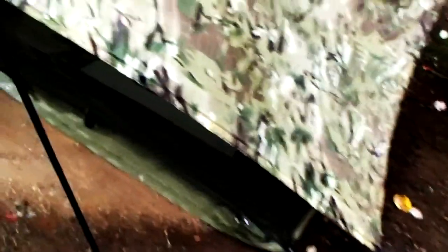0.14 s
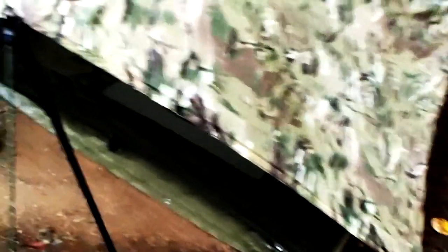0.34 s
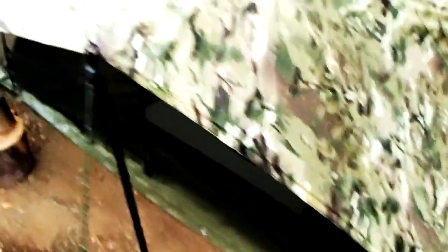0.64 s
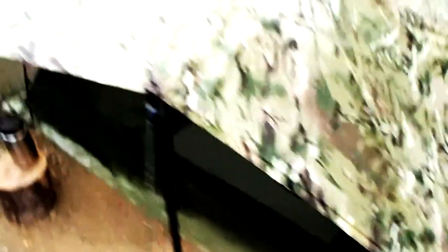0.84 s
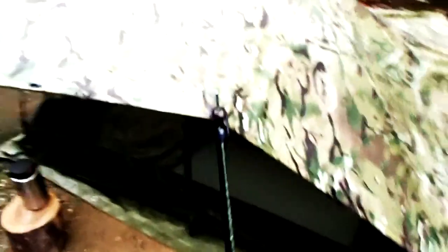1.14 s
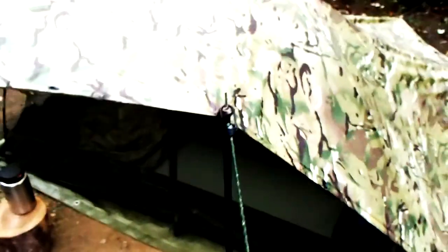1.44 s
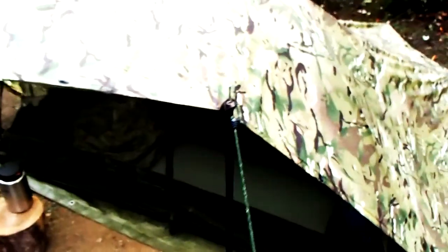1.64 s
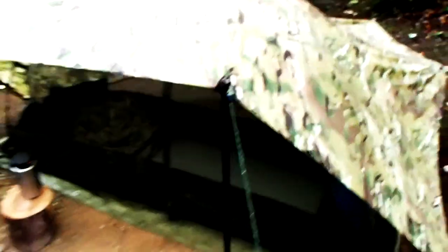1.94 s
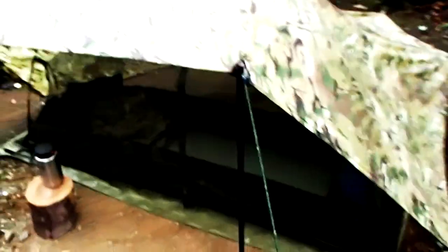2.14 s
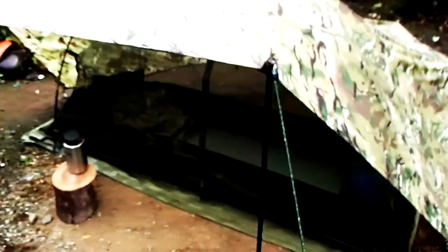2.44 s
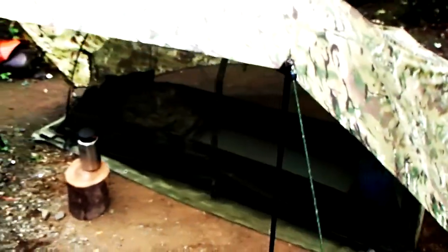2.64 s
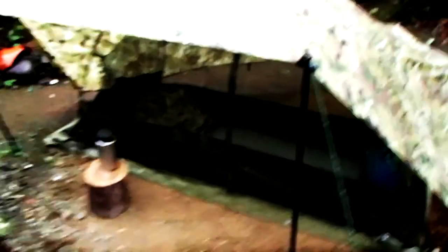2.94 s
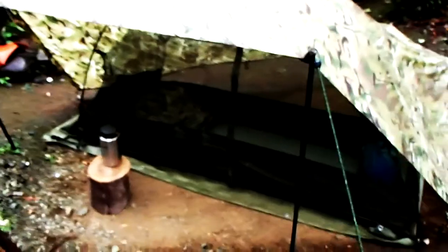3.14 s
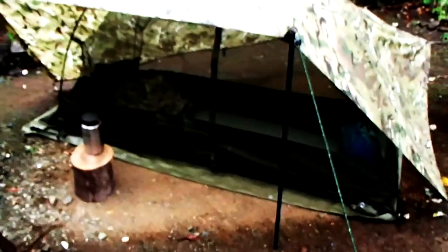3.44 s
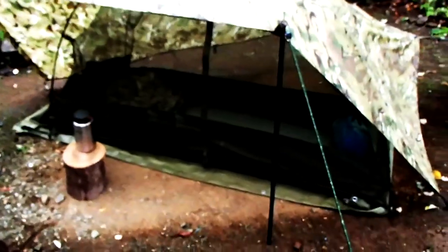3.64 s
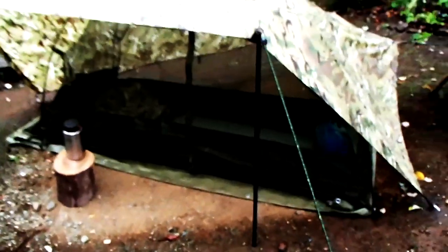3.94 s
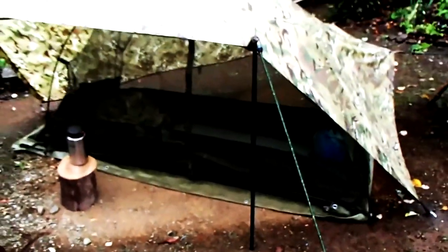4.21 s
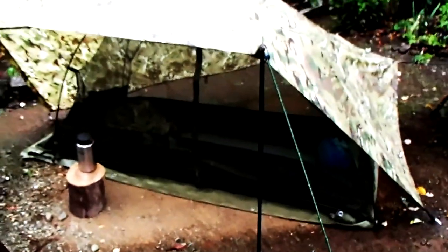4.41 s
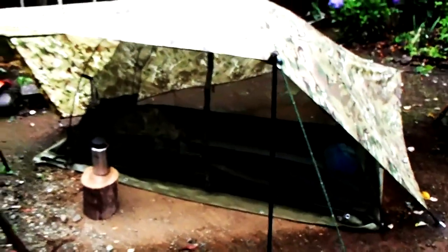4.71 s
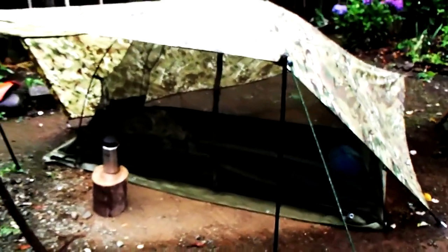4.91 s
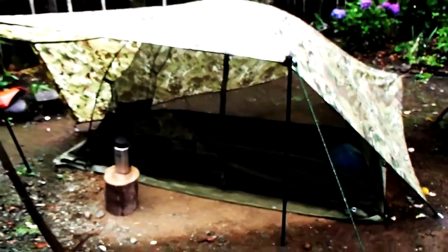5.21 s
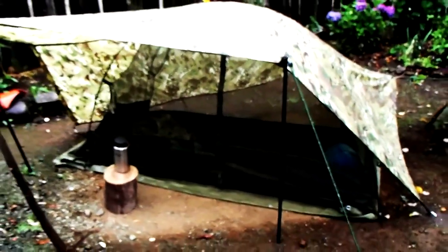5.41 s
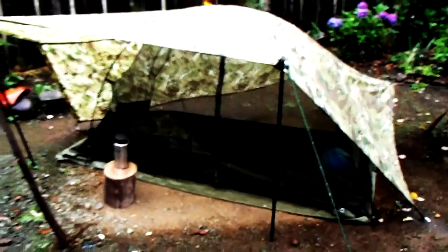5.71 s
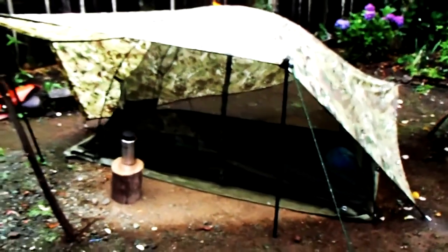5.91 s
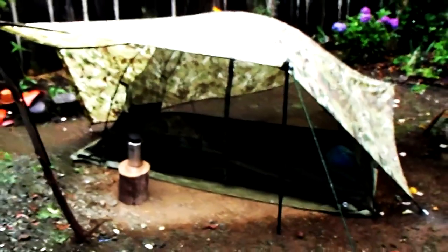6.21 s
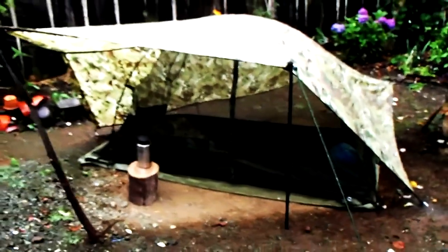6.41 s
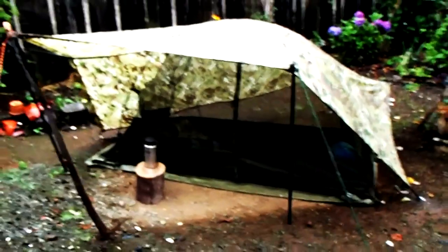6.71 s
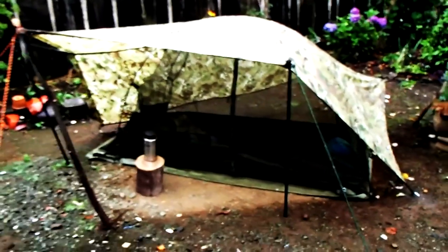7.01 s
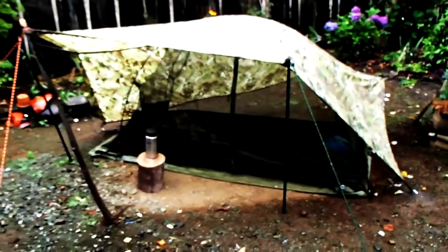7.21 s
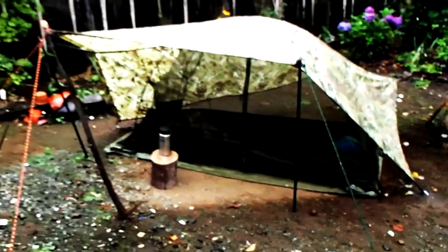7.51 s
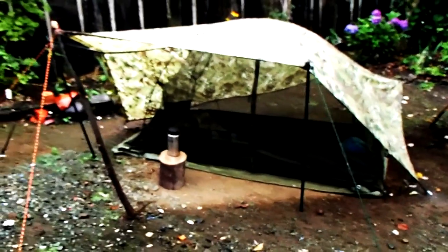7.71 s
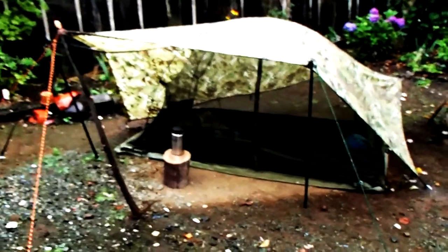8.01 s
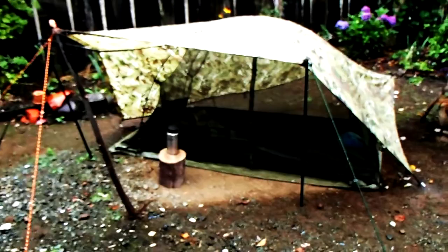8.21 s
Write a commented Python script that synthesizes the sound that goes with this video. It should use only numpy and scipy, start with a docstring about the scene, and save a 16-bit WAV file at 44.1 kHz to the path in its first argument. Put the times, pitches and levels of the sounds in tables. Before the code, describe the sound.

Steady rain on a tarp shelter in an open garden, with a continuous dense patter of small dry slaps, around two hundred a second, over a mid-toned hiss from wet soil and leaves and a soft low rumble. From 0 to 3 seconds the cloth is close: bright, snappy single drops crowd together, nearest around 0.6 to 0.9, with strong taps at 1.7, 2.1 and 2.5. From about 3.2 the patter is farther and quieter, the taps sparser and rounder, continuing evenly to the end at 8.3. Fine high spray prickles throughout. Soft, low handling thumps occur, clearest near 1.0 to 1.1, 3.9 and 5.2. At 6.27 a very loud, hard, dry tick hits beside the microphone, followed by a weaker, fuller one at 6.5. Barely audible low hums drift far away, one rising near 7.5. Echoes are tiny and short.

```python
"""Rain on a garden tarp

Steady rain falls on a tarp shelter in a garden, heard from a hand-held camera that ends up farther from the cloth.
Drops slap the taut fabric as shaped pulses, each with a quick echo, over filtered noise for the wash of
rain on wet ground and leaves. High spray ticks, and two drops land right by the microphone as dry pulses.
The hand bumps the camera softly with damped low waves; faint low tones and far hums waver as sines."""
import sys
import numpy as np
from scipy import signal
from scipy.fft import rfft, irfft
from scipy.io import wavfile
from scipy.ndimage import uniform_filter1d

SR = 44100
rng = np.random.default_rng(int(sys.argv[2]) if len(sys.argv) > 2 else 0)


def wrap_up_sound(samples):
    """Save the sound to the file named by the first command line argument, as 16-bit audio."""
    columns = np.atleast_2d(samples).T
    # keep every value between -1 and 1, then stretch to whole-number steps
    tamed = np.clip(columns, -1, 1)
    steps = np.round(tamed * 32767).astype(np.int16)
    wavfile.write(sys.argv[1], SR, steps)


N = 368235

# relative spectrum of the spray of a bursting drop: (pitch_hz, level_db_per_hz)
SPRAY_SPECTRUM = [(1000, -38), (4000, -7), (7000, 2.5), (9000, -0.5), (12000, 2.5), (15000, 5.5)]
DROP_SIZE = 2048  # samples in the sound of one drop
DROP_HZ = np.fft.rfftfreq(DROP_SIZE, 1 / SR)
LEAD_S = 0.0018  # a faint wave in the cloth precedes the slap by this much


def amp(db):
    """Decibels to gain."""
    return 10 ** (np.asarray(db) / 20)


def evened(x):
    """Scales to rms 1."""
    return x / np.sqrt(np.mean(x ** 2) + 1e-20)


def read(points, hz):
    """Reads a spectrum on a log-frequency axis."""
    f, value = np.transpose(points)
    return np.interp(np.log(hz + 1), np.log(f + 1), value)


def add(mix, start_s, sound):
    """Mixes a sound in at a time, cutting what runs past the end."""
    part = mix[max(round(start_s * SR), 0):][:len(sound)]
    part += sound[:len(part)]


def drift(shape, size):
    """Smoothed noise of rms 1, wandering along the last axis over some `size` steps."""
    once = uniform_filter1d(rng.standard_normal(shape), size)
    return evened(uniform_filter1d(once, size))


def click(db):
    """The sharpest causal (minimum-phase) pulse with this spectrum, with the energy of 3 ms at rms 1."""
    energy_samples = 128
    log_gain = np.log(amp(np.r_[db, db[-2:0:-1]]))
    minimum_phase = np.exp(np.conj(signal.hilbert(log_gain)))[:len(db)]
    pulse = irfft(minimum_phase)
    return evened(pulse) * np.sqrt(energy_samples / len(pulse))


def scatter(pulse, share, t60):
    """Trails a pulse with a short burst of random ripples that die away in t60 seconds, keeping its energy."""
    t = np.arange(len(pulse)) / SR
    onset = 1 - np.exp(-t / 0.000094)
    ripples = rng.choice([-1, 1], len(t)) * amp(-60 * t / t60) * onset
    trail = signal.fftconvolve(pulse, ripples / np.linalg.norm(ripples))[:len(t)]
    return evened(pulse + share * trail) * np.sqrt(np.mean(pulse ** 2))


def nearness_db(t):
    """Level of the patter on the tarp relative to 1 m away: it falls as 1 / distance."""
    # the camera passes the cloth, then backs away: (time_s, distance_m)
    camera_path = [(0, 1.04), (.5, 1.14), (.8, 0.77), (1.6, 1.17), (2.2, 1.1), (3.2, 1.55), (8.35, 1.64)]
    return -20 * np.log10(np.interp(t, *np.transpose(camera_path)))


def slap(ring_hz, ring_db, thud_db, snap_db, splash_db, delay_s, echo_db,
         ring_width=0.17, thud_hz=1800, snap_hz=4500, lead_db=-12):
    """One drop on cloth: a thud with the damped ring of the struck patch, a spray tick and a ground echo."""
    # relative spectrum of a plain blow on the cloth: (pitch_hz, level_db_per_hz)
    cloth_spectrum = [(100, -23), (300, -10), (500, -3.5), (700, -1.9), (1100, 1.4), (1700, -2.5),
                      (2500, -3.2), (3300, -2.5), (3950, -0.5), (4500, -10), (5000, -8), (6800, -18.5),
                      (8500, -25), (15500, -35.5)]
    ring = 1 / (1 + (np.log((DROP_HZ + 1) / ring_hz) / ring_width) ** 2)
    thud = 1 / (1 + (DROP_HZ / thud_hz) ** 6)  # slack cloth gives more body than taut cloth
    snap = 1 - 1 / (1 + (DROP_HZ / snap_hz) ** 12)  # a drop that meets a film of water lands more softly
    cloth_db = read(cloth_spectrum, DROP_HZ) + ring_db * ring + thud_db * thud + snap_db * snap
    cloth = click(cloth_db)
    spray = amp(splash_db) * scatter(click(read(SPRAY_SPECTRUM, DROP_HZ)), share=2.5, t60=0.0073)

    out = amp(lead_db) * scatter(cloth, share=5.0, t60=0.01)  # a faint wave runs ahead through the taut weave
    add(out, LEAD_S, scatter(cloth, share=0.62, t60=0.011) + spray)
    echo = scatter(cloth + spray, share=0.96, t60=0.013)  # rough ground smears the echo
    add(out, LEAD_S + delay_s, amp(echo_db) * echo)
    return out


def patter(per_s=195, clumping=0.13, spread_db=2.5, largest=1.8, count=500, db_at_1m=-47):
    """Many small drops, each striking one of `count` patches with its own slap; level follows tarp distance."""
    rate = per_s * np.maximum(1 + clumping * drift(N, size=1500), 0)  # drops arrive in little flurries
    hits = np.flatnonzero(rng.random(N) < rate / SR)
    size = amp(spread_db * np.minimum(rng.exponential(1, N), largest))
    patch = rng.integers(0, count, N)

    slaps = []
    for ring_hz in np.geomspace(720, 4300, count):
        polarity = rng.choice([-1, 1])
        sound = slap(ring_hz,
                     ring_db=rng.uniform(3.7, 13),
                     thud_db=rng.normal(0, 2.3),
                     snap_db=rng.normal(0, 3.7),
                     splash_db=rng.normal(-29, 3.3),
                     delay_s=rng.uniform(0.003, 0.0052),
                     echo_db=rng.uniform(-13, 0),
                     ring_width=rng.uniform(0.089, 0.16))
        slaps.append(polarity * sound)

    out = np.zeros(N)
    for i in hits:
        add(out, i / SR, size[i] * slaps[patch[i]])
    return amp(db_at_1m + nearness_db(np.arange(N) / SR)) * evened(out)


def wash(level_db=-46.5, patchy_db=1.04, flicker_db=-0.06, follow=0.14, rumble_hz=90):
    """Countless far drops on soil and leaves merge into a restless noise hiss over a low outdoor rumble."""
    # relative spectrum of the far rain and the rumble: (pitch_hz, level_db_per_hz)
    far_spectrum = [(15, -16), (35, -3), (80, -1.7), (130, -3), (200, -0.9), (370, -1), (500, -1.5),
                    (680, -.2), (1100, 0), (1600, -2), (2400, -3), (3400, -3), (3950, -0.5), (4500, -11),
                    (4900, -8.5), (6500, -15.5), (8200, -20.5), (15500, -24)]
    # slow level of the deepest rumble: (time_s, level_db)
    rumble_level = [(0, 4), (1.5, -6), (2.4, 3), (3.4, 1), (4.3, 1), (4.65, 4), (4.9, 4), (6.4, 0.5),
                    (7.5, 0.5), (8.35, 1)]
    window, hop = 1024, 256  # samples
    frames, hz = N // hop + 5, np.fft.rfftfreq(window, 1 / SR)
    frame_s = np.arange(frames) * hop / SR
    shape = (len(hz), frames)
    noise = rng.standard_normal(shape) + 1j * rng.standard_normal(shape)

    # small patches of time and pitch rise and fall
    patches = evened(uniform_filter1d(drift(shape, size=6), size=24, axis=0))
    near_db = nearness_db(frame_s)
    swell_db = follow * (near_db - near_db.mean()) + flicker_db * drift(frames, size=4)
    rain_share = hz / (hz + 400)  # the bass does not follow the rain
    rumble_share = 1 / (1 + (hz / rumble_hz) ** 4)
    rumble_db = rumble_share[:, None] * np.interp(frame_s, *np.transpose(rumble_level))

    spectrum_db = read(far_spectrum, hz)[:, None] + patchy_db * patches
    noise *= amp(spectrum_db + rain_share[:, None] * swell_db + rumble_db)
    sound = signal.istft(noise, nperseg=window, noverlap=window - hop)[1][:N]
    return amp(level_db) * evened(sound)


def fizz(per_s=260, spread_db=3.0, level_db=-66):
    """Fine spray ticks from drops bursting on gravel: short noise bursts at random moments."""
    ticks = (rng.random(N) < per_s / SR) * amp(spread_db * np.minimum(rng.exponential(1, N), 4))
    t = np.arange(DROP_SIZE) / SR
    decay = amp(-60 * t / 0.011)
    bursts = signal.oaconvolve(ticks, decay)[:N] * rng.standard_normal(N)
    colour = click(read(SPRAY_SPECTRUM, DROP_HZ))
    return amp(level_db) * evened(signal.oaconvolve(bursts, colour)[:N])


def far_tones(waver=0.01):
    """Faint low tones and far hums: wavering sines that glide, swell and fade; the last one rises in pitch."""
    # faint low tones and far hums that swell and fade:
    # (start_s, end_s, first_pitch_hz, last_pitch_hz, level_db)
    tones = [(0, .4, 204.7, 205, -63.5), (0.527, 1.08, 91.5, 90, -56), (1.85, 2.145, 70, 69.6, -63),
             (3.6, 5, 194.5, 196, -67.5), (5.501, 6.55, 79, 77.9, -69), (6.517, 7.25, 93.6, 93, -63),
             (6.8, 7.602, 200, 182.3, -68), (7.364, 7.951, 336, 428, -65)]
    out = np.zeros(N)
    for start_s, end_s, first_hz, last_hz, level_db in tones:
        n = max(round((end_s - start_s) * SR), 2)
        glide_hz = np.linspace(first_hz, last_hz, n)
        turns = np.cumsum(glide_hz * (1 + waver * drift(N, size=4000)[:n])) / SR
        tone = np.sqrt(2) * np.sin(2 * np.pi * turns)
        add(out, start_s, amp(level_db) * tone * signal.windows.tukey(n, 0.4))
    return out


def taps(typical_db=-37, splash_db=-20, splash_per_db=-0.3, echo_s=0.0041, echo_spread_s=0.0007):
    """The single drops that stand out: one slap each, with spray that grows more slowly than the thud."""
    # drops on the tarp, the ring being that of the struck patch:
    # (start_s, level_db, ring_hz, ring_db, thud_db, snap_db, ground_echo_db)
    tarp_drops = [(0.1206, -40.5, 2480, 6, 3, -6, 1), (0.1841, -32.5, 2330, 12, 0, 0, -11),
                  (0.1975, -42.5, 1800, 9, -3, -3, -1), (0.2227, -32.0, 2190, 6, -3, -6, -5),
                  (0.2745, -35.5, 2480, 6, -3, 0, -10), (0.2819, -35.5, 1020, 6, -3, -3, -8),
                  (0.3173, -38.0, 4410, 9, 3, -6, -8), (0.3986, -43.5, 1400, 12, 3, -3, -7),
                  (0.4274, -42.0, 2820, 9, 0, -3, -12), (0.4389, -43.5, 3420, 9, 0, -3, -5),
                  (0.6243, -29.5, 3010, 6, 3, 6, -1), (0.6322, -40.5, 3640, 3, 0, 0, -2),
                  (0.6461, -42.0, 2650, 9, 3, 0, 1), (0.6556, -40.5, 4140, 6, 3, -6, 0),
                  (0.6671, -35.0, 4140, 12, 6, -6, -2), (0.6872, -36.5, 2050, 6, 3, 0, -4),
                  (0.7157, -35.5, 1590, 9, 3, -6, -3), (0.7532, -35, 2050, 6, 3, -3, -7),
                  (0.7696, -40.0, 3010, 12, -3, 3, -3), (0.7797, -34.5, 4140, 18, -3, -3, -12),
                  (0.8319, -38.5, 1800, 12, 3, -3, -1), (0.9155, -36.0, 1590, 9, 0, -6, -12),
                  (0.9441, -38.0, 3010, 3, 0, 0, -2), (0.98, -36.0, 1920, 6, -3, -6, -12),
                  (1.0678, -39.0, 4700, 6, 0, 0, -6), (1.1062, -36.5, 3200, 6, 0, -3, -8),
                  (1.2048, -42.0, 2330, 6, -3, 3, -4), (1.2294, -40.0, 2190, 6, 3, 3, -4),
                  (1.2801, -40.0, 3420, 6, 3, -3, -2), (1.3779, -41.5, 2650, 12, 3, 0, 1),
                  (1.4195, -39.5, 3420, 12, 0, 0, -3), (1.4275, -32.5, 4700, 9, 0, 0, -1),
                  (1.5182, -38.5, 3880, 3, 0, -3, -6), (1.5468, -42.5, 840, 9, 3, 3, -2),
                  (1.5844, -43.0, 2330, 9, 0, 3, -12), (1.5974, -39.5, 2820, 6, -3, 0, -4),
                  (1.7142, -42.5, 1690, 6, 0, 3, -1), (1.7221, -29.5, 3640, 6, 3, 0, -3),
                  (1.7296, -40.0, 3420, 12, 0, 0, -12), (1.7757, -37.5, 4140, 6, 0, -3, -1),
                  (1.7847, -41.5, 3200, 6, -3, 6, -12), (1.9177, -39.5, 1800, 3, -3, 0, -6),
                  (2.0009, -38.5, 1590, 3, 0, 3, -3), (2.0444, -37.5, 1490, 12, 3, -3, -12),
                  (2.0654, -31.5, 2480, 6, 3, 0, -2), (2.0739, -42.5, 3200, 6, 0, 0, -3),
                  (2.0979, -35, 1400, 6, 3, -3, -2), (2.1316, -37, 3880, 6, 0, 3, -4),
                  (2.1777, -34.5, 3010, 9, -3, 3, -12), (2.2364, -40.5, 4700, 9, -3, 0, -12),
                  (2.251, -40.5, 1920, 6, 0, 3, -5), (2.2948, -36.0, 2480, 6, 3, -3, -4),
                  (2.3662, -38.5, 1490, 9, 0, -6, -3), (2.4129, -42.5, 4700, 6, 3, 0, 2),
                  (2.4904, -43.5, 2650, 9, 0, -3, 1), (2.5329, -41.0, 4700, 3, 0, -3, -10),
                  (2.5409, -31.5, 2650, 9, 6, 3, -1), (2.5761, -40.5, 3640, 6, -3, 3, -12),
                  (2.6465, -37.0, 2820, 6, 3, 3, -1), (2.7203, -40.5, 1800, 6, 3, 3, -6),
                  (2.7448, -36.5, 4140, 6, 3, -6, -5), (2.763, -37.5, 1490, 9, 0, -3, -8),
                  (2.7806, -38.0, 2050, 6, 0, 3, -12), (2.791, -43.0, 2050, 6, 0, 0, 2),
                  (2.8278, -40.0, 2050, 9, 0, 0, -8), (2.9419, -41.0, 1080, 9, 3, 3, -12),
                  (2.9756, -39.5, 2820, 9, 0, 0, -8), (3.0514, -39.0, 1400, 3, 0, 0, -2),
                  (3.0828, -40.0, 3010, 6, 0, 0, -4), (3.2539, -41.5, 2650, 12, 3, 0, -4),
                  (3.2999, -42.0, 650, 15, 0, 0, 0), (3.3818, -40.0, 1590, 6, 0, -3, -7),
                  (3.4989, -38.5, 1920, 6, 0, 0, -7), (3.5282, -38.5, 1310, 12, 0, -3, -6),
                  (3.5378, -40.0, 2190, 6, -3, 0, 0), (3.5794, -39.0, 1590, 9, -3, 3, 2),
                  (3.5926, -39.5, 3200, 9, 3, 3, -3), (3.6614, -38.0, 1490, 12, 0, 0, -4),
                  (3.7096, -37.5, 4700, 9, 6, 0, -1), (3.8209, -39.0, 3010, 9, 3, -3, -11),
                  (3.9362, -38.0, 3420, 6, -3, 0, -7), (4.1155, -39.5, 650, 6, 0, -3, -2),
                  (4.1375, -36.5, 4700, 9, -3, -9, -7), (4.2903, -39.5, 790, 9, 3, -3, -6),
                  (4.3035, -40.0, 2480, 9, 3, -3, 0), (4.3665, -35.5, 3640, 18, 0, -9, -12),
                  (4.4296, -38.5, 2820, 12, 3, -6, -5), (4.6299, -41.5, 790, 9, -3, 3, -4),
                  (4.8544, -40.0, 3200, 9, 0, -3, -11), (4.868, -43, 1100, 18, 0, -6, -9),
                  (4.881, -44, 1080, 18, 0, -6, -9), (4.9264, -42.5, 2050, 15, -3, 3, -4),
                  (4.9407, -38.5, 1690, 6, 3, 3, -7), (5.0494, -41.0, 2820, 9, 3, -3, 0),
                  (5.2153, -42.5, 2480, 6, 0, 0, -3), (5.247, -41.5, 1490, 12, 0, 6, -5),
                  (5.3261, -42.0, 1690, 9, 0, -3, -1), (5.5019, -36.5, 1920, 6, 3, 6, -3),
                  (5.7252, -40.5, 2650, 6, 3, -3, -1), (5.9774, -40.5, 2330, 3, -3, 0, -6),
                  (6.0515, -40.0, 790, 3, 0, 0, -12), (6.1102, -38.5, 1230, 9, 0, -6, -7),
                  (6.1468, -40.5, 2050, 12, 0, 0, -12), (6.4883, -39.5, 950, 6, 0, -3, 1),
                  (6.5465, -39.5, 2820, 9, -3, 3, -1), (6.6988, -42.5, 2650, 6, 0, 3, -1),
                  (6.7423, -38.0, 2480, 6, 0, 3, -5), (6.7913, -37, 3010, 6, 6, -3, -3),
                  (7.049, -39.0, 1920, 6, 3, 0, -12), (7.2648, -40.5, 3010, 3, 0, 3, -4),
                  (7.274, -42, 700, 18, 0, -3, -3), (7.4343, -41.5, 2480, 9, 0, 3, -4),
                  (7.5545, -39.5, 3880, 12, -3, 3, -12), (7.609, -43, 790, 12, 3, -3, -6),
                  (7.6508, -39.5, 1230, 6, 0, -3, -9), (7.674, -42.5, 950, 9, 6, -6, -6),
                  (7.6869, -36.0, 3420, 9, 9, 0, -12), (7.7824, -41.0, 1800, 9, 3, -3, -5),
                  (7.8434, -40.5, 2650, 6, 0, -6, -12), (7.9603, -41.5, 650, 6, -3, 6, 0),
                  (8.2703, -39.5, 840, 6, 0, 6, -6)]
    out = np.zeros(N)
    heights = rng.uniform(-1, 1, len(tarp_drops))  # the cloth hangs at different heights
    for (start_s, level_db, *colour, echo_db), height in zip(tarp_drops, heights):
        spray_db = splash_db + splash_per_db * (level_db - typical_db)  # relative to the drop
        delay_s = echo_s + echo_spread_s * height  # the slap comes back off the ground
        add(out, start_s - LEAD_S, amp(level_db) * slap(*colour, spray_db, delay_s, echo_db))
    return out


def bumps(damping=0.69, knock_db=-6, knock_hz=180, shudder_db=-15, shudder_t60=0.2, shudder_hz=230):
    """The hand on the camera: a low push and rebound, a short knock of the case, a brief shudder of the grip."""
    # soft bumps: (push_centre_s, push_peak_db, pitch_hz)
    hand_bumps = [(.262, -46, 55), (0.38, -45, 50), (.79, -45, 60), (.961, -40.5, 85), (1.141, -37, 114),
                  (2.054, -46, 90), (2.885, -44, 55), (2.9, -47, 70), (2.97, -48, 97), (3.301, -46, 85),
                  (3.552, -48, 100), (3.868, -38.5, 59.4), (3.974, -40, 80), (4.633, -49, 50),
                  (4.665, -50, 40), (5.188, -38, 60), (5.224, -45, 100), (5.246, -46, 110),
                  (5.317, -49, 54.4), (5.618, -45, 70), (5.809, -42, 90), (6.381, -49, 65), (6.46, -44, 70)]
    out, t = np.zeros(N), np.arange(-DROP_SIZE, 2 * DROP_SIZE) / SR
    low_pass = signal.butter(2, shudder_hz, fs=SR)
    for centre_s, peak_db, hz in hand_bumps:
        u, v = 2 * np.pi * hz * t, 2 * np.pi * knock_hz * t
        push = np.cos(u) / np.cosh(damping * u)
        knock = amp(knock_db) * -np.sin(v) * np.exp(-(v / np.pi) ** 2)
        jolts = rng.standard_normal(len(t))
        dying = (t > 0) * amp(shudder_db - 60 * np.maximum(t, 0) / shudder_t60)
        steady_rms = np.std(signal.lfilter(*low_pass, jolts))
        shudder = signal.lfilter(*low_pass, jolts * dying) / steady_rms
        add(out, centre_s + t[0], amp(peak_db) * (push + knock + shudder))
    return out


def sprays(t60=0.012):
    """Thin, high ticks of spray, some on top of a tarp drop: the spray pulse with a trail of ripples."""
    # high spray ticks, some on top of a tarp drop: (start_s, level_db)
    spray_ticks = [(.381, -46), (2.131, -47), (2.18, -50), (2.919, -50), (5.1786, -47)]
    out, tick = np.zeros(N), click(read(SPRAY_SPECTRUM, DROP_HZ))
    for start_s, level_db in spray_ticks:
        add(out, start_s, amp(level_db) * scatter(tick, share=2.5, t60=t60))
    return out


def near_drops(rebound=0.34, burst_s=0.00023):
    """Dry, hard ticks a hand's width from the microphone; the burst of each drop draws the tick out a little."""
    # drops right by the microphone: (start_s, level_db)
    close_drops = [(6.2713, -15.5), (6.5087, -24)]
    # relative spectrum of each: (pitch_hz, first_drop_db, second_drop_db)
    colours = np.array([(150, -33, -9), (310, -18, -6), (450, -13, 1), (600, -6.5, -1), (800, -11, 0),
                        (910, -17, 3), (1085, 3, -7), (1540, -1, 5), (1870, -0.5, 2), (2180, -10, -9),
                        (2540, -2, 3), (3000, -18, 3), (3300, -5, 0), (3700, 0.5, 4), (4020, 3, -1),
                        (4400, -4, -10), (5400, -18, -1.5), (6300, -17, -19), (7200, -13, -14),
                        (8000, -29, -30), (10500, -22.5, -34), (15500, -29, -30)])
    out = np.zeros(N)
    hardest_db = max(level_db for _, level_db in close_drops)
    for k, (start_s, level_db) in enumerate(close_drops):
        # the harder the drop, the longer the lag of its burst: it is proportional to the drop's energy
        lag_s = burst_s * amp(level_db - hardest_db) ** 2
        tick = click(read(colours[:, [0, k + 1]], DROP_HZ))
        lag = np.exp(-2j * np.pi * DROP_HZ * round(lag_s * SR) / SR)
        all_pass = (lag - rebound) / (1 - rebound * lag)  # spreads in time, keeps the colour
        tick = irfft(rfft(tick) * all_pass)
        add(out, start_s, amp(level_db) * scatter(tick, share=0.27, t60=0.014))
    return out


def garden(x, t60=0.11):
    """A short, thin tail of sparse random reflections from the cloth, the ground and the fence."""
    t = np.arange(SR // 4) / SR
    reflections = rng.standard_normal(len(t)) * (rng.random(len(t)) < 2500 / SR)  # 2500 per second
    tail = reflections * (t > 0.005) * amp(-60 * t / t60)
    return signal.oaconvolve(x, tail / np.linalg.norm(tail))[:N]


def scene():
    """Rain on the tarp and around it, with the small sounds near the camera and the faint tones far off."""
    tarp, near = taps() + patter() + sprays(), near_drops()
    echoes = garden(amp(-13.0) * tarp + amp(-35) * near)
    return (tarp + near + echoes + wash() + fizz() + bumps() + far_tones())[None]


def record(dry, dip_hz=470, dip_q=2.43, dip_depth=0.56, edge_hz=15900):
    """The microphone's hollow in the low mids, then the recorder's band limit."""
    low_mids = signal.lfilter(*signal.iirpeak(dip_hz, dip_q, SR), dry)
    coloured = dry - dip_depth * low_mids
    band_limit = signal.firwin(511, edge_hz, window=("kaiser", 9), fs=SR)
    return signal.oaconvolve(coloured, band_limit[None], "same")


dry = scene()
out = record(dry)
wrap_up_sound(out)
```